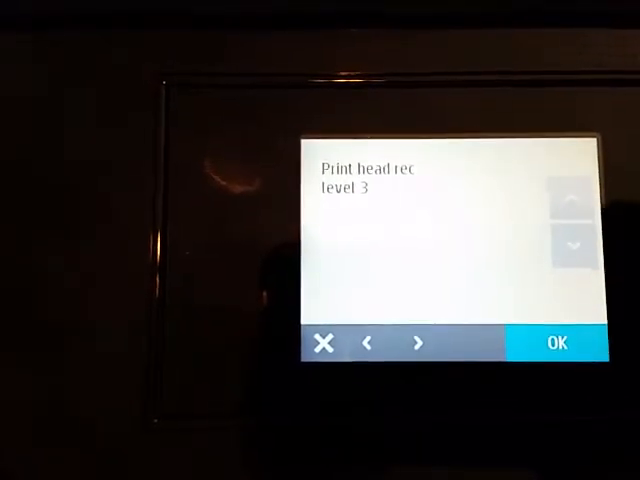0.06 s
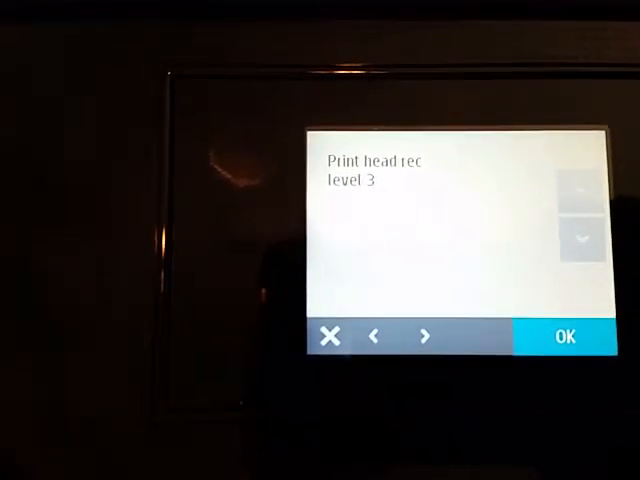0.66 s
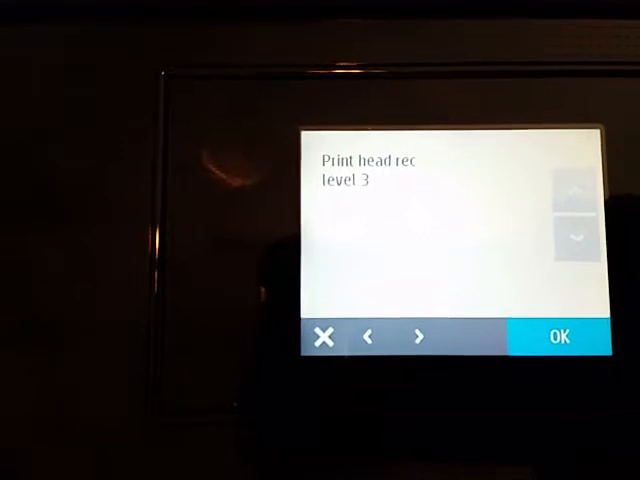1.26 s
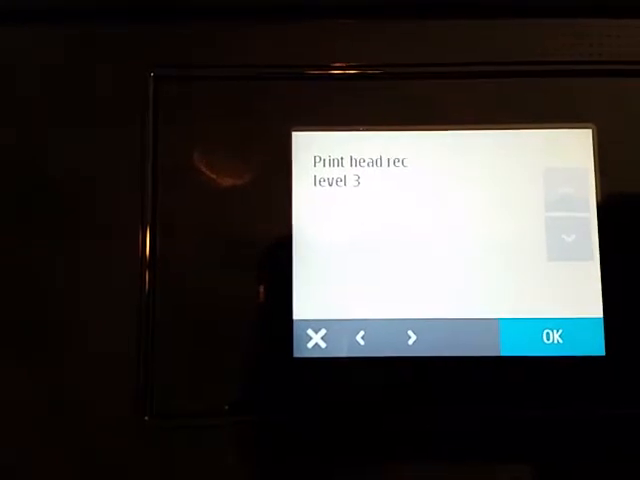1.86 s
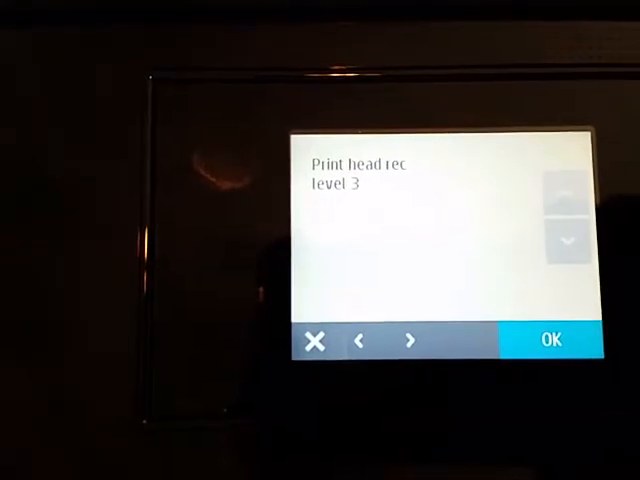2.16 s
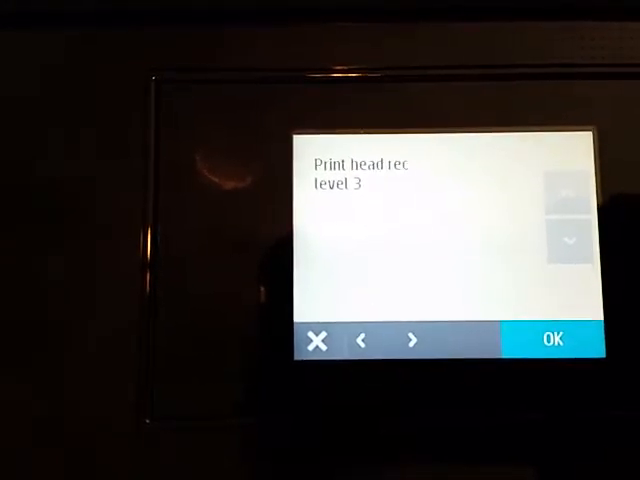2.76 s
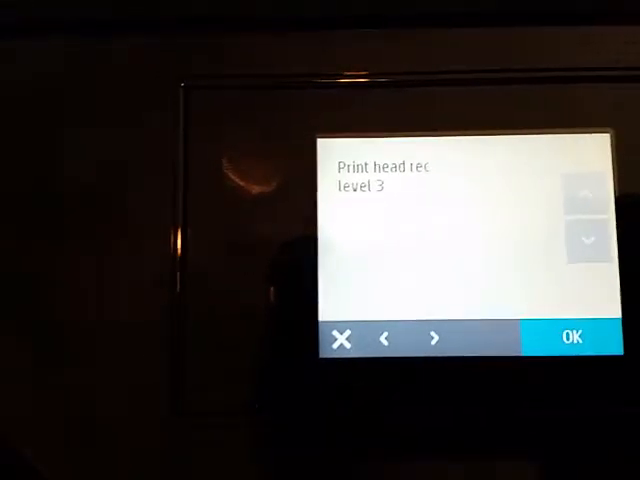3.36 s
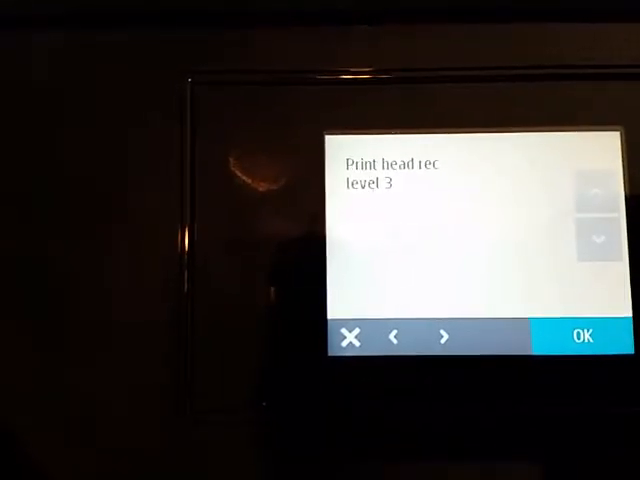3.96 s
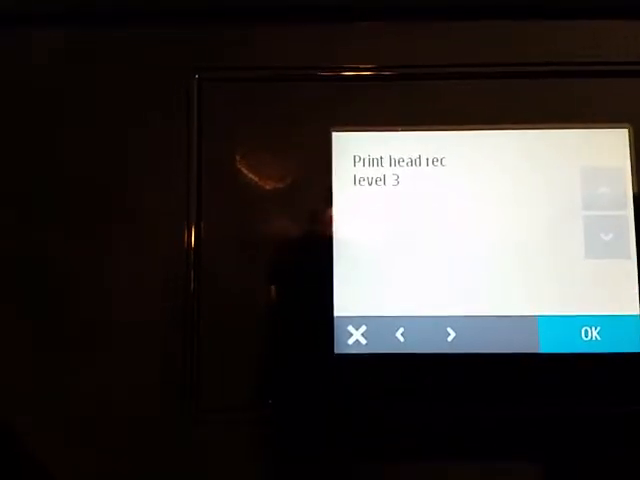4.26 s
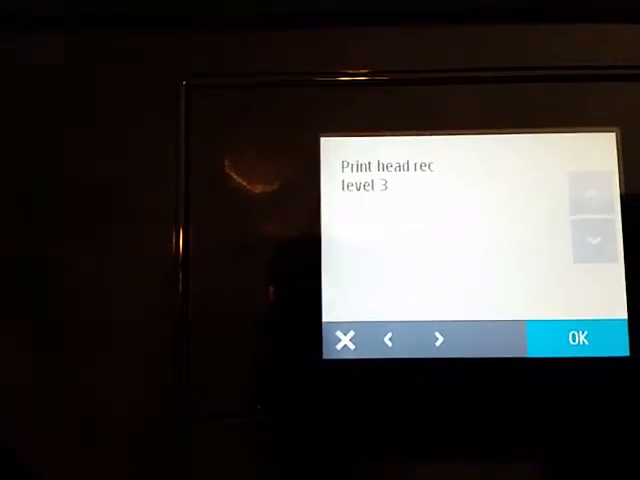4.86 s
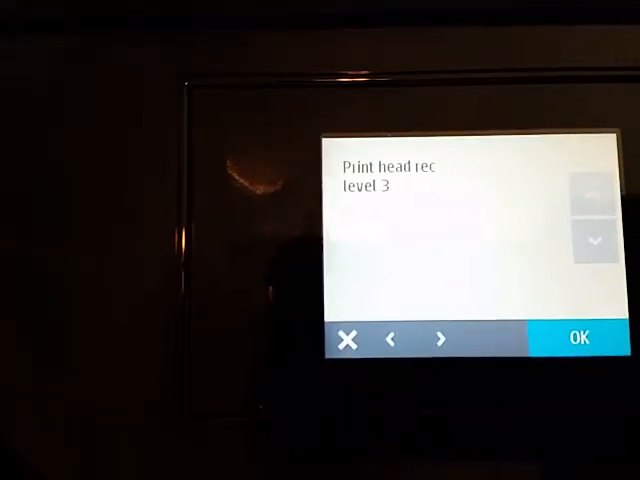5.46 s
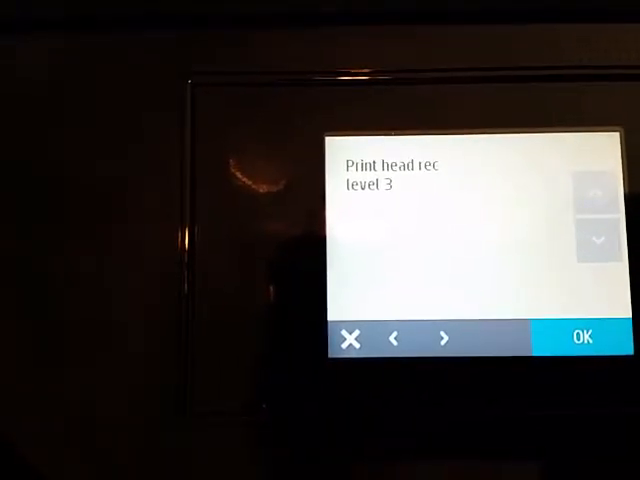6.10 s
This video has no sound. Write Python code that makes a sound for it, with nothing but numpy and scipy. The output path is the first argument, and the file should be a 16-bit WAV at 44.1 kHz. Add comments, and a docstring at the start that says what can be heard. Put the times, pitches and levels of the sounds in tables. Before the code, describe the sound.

An inkjet printer works through a cleaning cycle near a hand-held stereo microphone. A short gear whir with clicks ends in a ringing latch snap. The machine falls quiet, leaving a fading hum, low room noise and dull bumps of a hand on the microphone. Then parts knock into place in the hollow casing, and three bursts of whining, grinding motor follow with busy plastic clatter.

```python
"""An inkjet printer's cleaning cycle in a quiet room, close to the stereo microphone of a hand-held camera.
First a geared motor runs in reverse to park the print head; a sprung latch snaps and a faint hum lingers.
In the pause the hand bumps the camera, over low room rumble and a hiss on the left.
From 3.4 s the cleaning station knocks into place. At 4.5 s the motor starts forward, in three runs:
its gears whine and grind while plastic parts rattle and slide inside the hollow casing."""
import sys
import numpy as np
from scipy import signal
from scipy.fft import rfft, irfft, next_fast_len
from scipy.io import wavfile
from scipy.ndimage import map_coordinates

SR = 44100
rng = np.random.default_rng(int(sys.argv[2]) if len(sys.argv) > 2 else 0)


def bounce(signal):
    """Save signal as a 16-bit WAV file at the path given by the first command-line argument."""
    frames = np.transpose(np.atleast_2d(signal))
    limited = np.clip(frames, -1, 1)
    pcm = np.round(limited * 32767).astype(np.int16)
    wavfile.write(sys.argv[1], SR, pcm)


N = 270333


def amp(db):
    """Decibels to gain."""
    return 10 ** (np.asarray(db) / 20)


def unit(x):
    """x at rms 1."""
    return x / np.sqrt(np.mean(x ** 2) + 1e-20)


def along(points, hz):
    """(freq_hz, value) points read on a log frequency axis."""
    freqs, values = np.transpose(points)
    return np.interp(np.log(hz + 1), np.log(freqs + 1), values)


def wobble(knots_per_s):
    """A smooth random curve."""
    knots = rng.standard_normal(int(N * knots_per_s / SR) + 4)
    return map_coordinates(knots, [np.arange(N) * knots_per_s / SR])


def pan(left_db):
    """Left and right gains of mean power 1, the left louder by left_db."""
    gains = amp(np.array([np.atleast_1d(left_db), -np.atleast_1d(left_db)]) / 2)
    return gains / np.sqrt(np.mean(gains ** 2, axis=0))


def white():
    """Two channels of unrelated noise."""
    return rng.standard_normal((2, N))


def envelope(start, stop, attack_s, t60):
    """Attack, hold and release, between 0 and 1."""
    t = np.arange(N) / SR
    attack = 1 - np.exp(-np.maximum(t - start, 0) / attack_s)
    return attack * amp(-60 * np.maximum(t - stop, 0) / t60)


def blows(times, levels_db, t60, room_db, room_t60):
    """Envelope of contacts: each builds briefly, dies fast in the plastic, then slowly in the room."""
    t = np.arange(SR) / SR
    decay = amp(-60 * t / t60) ** 2 + amp(room_db - 60 * t / room_t60) ** 2
    onset = 1 - np.exp(-t / 0.0025)
    samples = np.clip(np.asarray(times) * SR, 0, N - 1).astype(int)
    power = np.bincount(samples, amp(levels_db) ** 2, N)
    return np.sqrt(np.abs(signal.fftconvolve(power, decay * onset)[:N]))


def chatter(per_s, scatter_db, t60, room_db):
    """A stream of small uneven contacts, rms 1."""
    jitter, strength = rng.standard_normal((int(N / SR * per_s), 2)).T
    times = (np.arange(len(jitter)) + jitter / 2) / per_s
    levels_db = scatter_db * np.clip(strength, -2, 2)
    return unit(blows(times, levels_db, t60, room_db, room_t60=0.27) * white())


# resonances of the hollow casing: pitch_hz, width_hz, lift_db
CASING_MODES = [(117, 110, 5), (226.6, 49, 11.5), (303.3, 26.4, 11.5), (426.4, 61, 8), (514, 78, 7.5),
                (597.4, 18, 7.5), (645, 31, 8.5), (820, 64, 4.5), (940, 48, 6), (1170, 130, 3),
                (1416, 97, -0.5), (1900, 120, 3), (2150, 72, -0.5), (2437, 36, 3.5), (4654, 57, 5.5)]
# how alike the printer sounds on the two sides of the microphone: freq_hz, coherence
COHERENCE = [(60, .86), (130, .93), (290, .9), (640, .72), (1400, .06), (3000, .02)]
# where the printer sits in the stereo image: freq_hz, left_db
BALANCE = [(60, 1.5), (350, 4), (700, 3.5), (1300, -1.5), (2400, -1), (4400, -3), (8100, -1), (13000, 8.5)]
def radiate(pair, spectrum, modes=CASING_MODES, ripple_db=0, coherence=COHERENCE, balance=BALANCE):
    """The path to the microphone: colour a mid and a side excitation and place them in stereo."""
    size = 2 * next_fast_len(N // 2 + SR // 4)
    hz = np.fft.rfftfreq(size, 1 / SR)
    resonances_db = sum(lift / (1 + (2 * (hz - centre) / width) ** 2) for centre, width, lift in modes)
    # higher up, countless small modes of the plastic crowd into narrow random peaks
    crowd = map_coordinates(rng.standard_normal(SR // 40), [hz / 26]) * along([(600, 0), (1500, 1)], hz)
    colour_db = along(spectrum, hz) + resonances_db + ripple_db * crowd
    # minimum phase, so nothing rings before it is struck
    cepstrum = irfft(np.log(unit(amp(colour_db)) + 1e-6))
    cepstrum[1:size // 2] *= 2
    cepstrum[size // 2 + 1:] = 0
    spread = np.arccos(np.clip(along(coherence, hz), -1, 1)) / 2
    mid, side = rfft(pair, size) * np.exp(rfft(cepstrum)) * [np.cos(spread), np.sin(spread)]
    return irfft(np.array([mid + side, mid - side]) * pan(along(balance, hz)), size)[:, :N]


# spectra of the room's rumble and of the hiss: freq_hz, level_db
RUMBLE_SPECTRUM = [(20, -6.5), (85, 0), (170, -9.5), (250, -13.5), (600, -28.5), (1200, -33.5), (2300, -48),
                   (6000, -50.5), (16000, -48.5)]
HISS_SPECTRUM = [(2300, -31), (2900, -14), (3250, -11), (3600, -3.5), (4100, -2), (4650, -9), (5000, -24),
                 (5300, -46), (11500, -43.5), (14300, -21), (16000, -26)]
# slow swell of the hiss: time_s, level_db
HISS_SWELL = [(0, -56.5), (.5, -60.5), (.9, -68), (1.4, -64.5), (1.8, -69.5), (2.5, -73), (3.2, -68),
              (3.7, -64.5), (4.3, -62.5), (6.1, -56.5)]
def room_tone():
    """Low rumble around the microphone, and a hiss on the left that sinks during the pause."""
    rumble = radiate(white(), RUMBLE_SPECTRUM, modes=[], balance=[(60, 1.3), (1000, 1.8)],
                     coherence=[(60, 0.45), (130, 0.47), (290, 0.083), (900, 0)])
    hiss = radiate(white(), HISS_SPECTRUM, modes=[], coherence=[(1000, 0.0087)],
                   balance=[(2800, 10), (4000, 17.2), (6000, 7.4), (15000, 7.7)])
    swell_db = np.interp(np.arange(N) / SR, *np.transpose(HISS_SWELL))
    return amp(-65 + wobble(27)) * rumble + amp(swell_db) * hiss


def swing(t, hz, rise_s):
    """A softly started, heavily damped swing whose envelope peaks at rise_s."""
    return (t / rise_s) ** 2 * np.exp(2 * (1 - t / rise_s)) * np.sin(2 * np.pi * hz * t)


# handling noise, right at the microphone: start_s, thump_db, tap_db, left_db
HAND_BUMPS = [(1.027, -38, -38, -6.5), (1.313, -50, -56, 5), (1.382, -39.5, -59, 13), (1.413, -44, -65, 5),
              (1.466, -41, -48.5, 5), (2.913, -38.5, -72, -16), (3, -38.5, -43, -6.5),
              (3.079, -48.5, -53, 8), (3.135, -50.5, -60, 5)]
def hand_bumps():
    """A hand bumps the camera: a low thump and a dull tap, with no room sound."""
    out = np.zeros((2, N))
    for start, thump_db, tap_db, left_db in HAND_BUMPS:
        t = np.maximum(np.arange(N) / SR - start, 0)
        thump = amp(thump_db) * swing(t, hz=100, rise_s=0.0064)
        tap = amp(tap_db) * swing(t, hz=387, rise_s=0.0032)
        out += pan(left_db) * (thump + tap)
    return out


def whine(shaft_hz, orders, flutter, waver_db):
    """Tones locked to a shaft whose speed flutters under load, left of centre."""
    phase = 2 * np.pi * np.cumsum(shaft_hz * (1 + flutter * wobble(45))) / SR
    tones = sum(amp(level_db + waver_db * wobble(25)) * np.sin(order * phase + rng.uniform(0, 2 * np.pi))
                for order, level_db in orders)
    return np.sqrt(2) * tones * pan(5)


SET_IN_S, COAST_T60_S = 0.0065, 0.51  # onset of hum and idling; fade of hum and motor
# hum from the parked printer: start_s, stop_s, pitch_hz, level_db
PARKED_HUM = (.45, 1.38, 296.5, -68.5)
def hum():
    """A faint, wavering tone lingers after the head has parked."""
    start, stop, pitch_hz, level_db = PARKED_HUM
    tone = whine(pitch_hz, [(1, 0)], flutter=0.01, waver_db=3.5)
    return amp(level_db) * envelope(start, stop, SET_IN_S, COAST_T60_S) * tone


# tiny contacts in the mechanism: start_s, relative_db
TICK_HITS = [(.124, -52), (.225, -47.5), (.427, -51.5), (.953, -69), (1.119, -70), (3.431, -69),
             (3.842, -68), (4.066, -65), (5.002, -41), (5.298, -38), (5.532, -40), (5.611, -46.5),
             (5.871, -51.5), (6.068, -40)]
# their spectrum: freq_hz, level_db
TICK_SPECTRUM = [(3000, -29.5), (7000, -17), (11000, -11.5), (13200, -3.5), (16000, -12.5)]
def ticks():
    """Very short, bright contacts, almost dry this close up."""
    times, levels_db = np.transpose(TICK_HITS)
    bursts = blows(times, levels_db + 8, t60=0.022, room_db=-33, room_t60=0.25) * white()
    return radiate(bursts, TICK_SPECTRUM, modes=[])


# small levers inside the casing: start_s, pitch_hz, level_db
LEVER_FLICKS = [(.199, 2394, -31), (3.964, 1003, -37), (5.139, 1214, -27), (5.28, 1504, -31),
                (5.352, 4960, -34.5), (5.39, 2110, -29.5), (5.427, 1496, -27.5), (5.679, 1155, -31.5),
                (6.114, 2056, -25.5)]
def levers(t60=0.045):
    """Each flicked lever gives one short, wavering plastic ring at its own pitch."""
    out, t = np.zeros((2, N + SR)), np.arange(SR // 5) / SR
    onset = 1 - np.exp(-t / 0.0011)
    for start, pitch_hz, level_db in LEVER_FLICKS:
        drift = np.cumsum(rng.normal(0, 0.029, (2, len(t))), axis=1)
        ring = amp(level_db - 60 * t / t60) * np.sin(2 * np.pi * pitch_hz * t + drift)
        out[:, round(start * SR):][:, :len(t)] += onset * ring
    return out[:, :N]


# the latch snapping shut: start_s, level_db
LATCH_SNAPS = [(.425, -37)]
# modes of its spring: pitch_hz, relative_db, t60_s
SPRING_MODES = [(598, -6, .19), (915, -14, .25), (1017, -11, .26), (1453, -1, .23), (1938, -8, .22),
                (2256, -5.5, .28), (2476, -8, .14), (3420, -19, .1), (4678, -15, .25)]
def latch():
    """The latch spring rings on after the snap, right of centre."""
    out, t = np.zeros((2, N + SR)), np.arange(SR // 2) / SR
    onset = 1 - np.exp(-t / 0.002)
    for start, level_db in LATCH_SNAPS:
        for pitch_hz, mode_db, t60 in SPRING_MODES:
            decay = amp(level_db + mode_db + rng.normal(0, 1) - 60 * t / t60)
            tone = np.sin(2 * np.pi * pitch_hz * t + rng.uniform(0, np.pi / 2, (2, 1)))
            out[:, round(start * SR):][:, :len(t)] += onset * decay * tone
    return out[:, :N] * pan(-5)


def contact(times, levels_db, t60, room_db, room_t60, strike_db):
    """Each contact is one sharp push in the mid channel, then a diffuse ring."""
    push = np.bincount((times * SR).astype(int), amp(levels_db + strike_db), N)
    return blows(times, levels_db, t60, room_db, room_t60) * white() + np.outer([1, 0], push)


# blows of plastic on plastic, levels relative: start_s, body_db, thud_db, clack_db, clack_left_db
KNOCK_HITS = [(0.074, -35.5, -62.5, -40, 2), (.2, -35.5, -63.5, -32, -4), (.256, -32, -46.5, -33, 1.5),
              (0.406, -44, -48, -41.5, 6), (.423, -39, -45, -26.5, -6), (.432, -34, -46, -42, 1),
              (1.276, -50.5, -50, -79, -4), (3.28, -58, -68, -84, 2.5), (3.433, -41, -35, -55.5, 1),
              (3.469, -41, -59, -70, 1), (3.762, -38.5, -41, -54, 0), (3.792, -33.5, -30.5, -58, -6),
              (3.82, -37, -52, -41.5, -5), (3.841, -40, -47, -46, 6), (3.965, -24.5, -29, -34, -6.5),
              (3.999, -30, -33.5, -38.5, 0), (4.022, -36.5, -48, -48, -3), (4.05, -52, -41, -39.5, 1),
              (4.066, -41.5, -43, -37, -0.5), (5.022, -58, -41.5, -35, 2), (5.111, -60, -66, -36, 0),
              (5.137, -46, -40, -30.5, 2), (5.265, -31, -53, -39, 4), (5.283, -24.5, -56, -54, -4),
              (5.388, -26, -40, -45, -4), (5.424, -41.5, -41, -37, -2), (5.454, -34.5, -45, -29, -4),
              (5.473, -53.5, -48.5, -26, 3.5), (5.519, -28.5, -41, -38.5, -6.5),
              (5.54, -37.5, -43, -52, -1), (5.611, -26.5, -56, -24.5, 3), (5.678, -30.5, -34, -28.5, -0.5),
              (5.87, -28.5, -37.5, -32.5, 0), (6.099, -40, -50, -38, -2), (6.113, -49.5, -43, -37.5, -14)]
# spectra of the casing, the chassis and the point of contact: freq_hz, level_db
BODY_SPECTRUM = [(100, -32.5), (190, 2), (300, 0.5), (420, -2.5), (620, -3.5), (900, -4.5), (1250, -4),
                 (1700, -21.5), (2500, -41), (6000, -55.5)]
THUD_SPECTRUM = [(20, -43.5), (40, -11), (65, -5), (100, -2), (150, -8), (250, -24.5), (800, -73.5)]
CLACK_SPECTRUM = [(250, -25), (700, -2), (1200, 1), (2100, 0), (2550, -2), (2900, -11), (4400, -7),
                  (5500, -21.5), (8000, -32.5), (11000, -37.5), (16000, -24)]
def knocks(rebound_s=0.012, rebound_spread=0.2, rebound_db=-10):
    """Each blow rings the casing, shakes the chassis and clacks where it lands, then rebounds once."""
    starts, *levels_db, left_db = np.transpose(KNOCK_HITS)
    place = pan(np.interp(np.arange(N) / SR, starts, left_db))
    flight_s = rebound_s * np.exp(rebound_spread * rng.standard_normal(len(starts)))
    times = np.append(starts, np.minimum(starts + flight_s, (N - 1) / SR))
    body_db, thud_db, clack_db = (np.append(db, db + rebound_db) for db in levels_db)
    body = contact(times, body_db - 4, t60=0.18, room_db=-14, room_t60=0.15, strike_db=20.5)
    thud = contact(times, thud_db, t60=0.038, room_db=-11.5, room_t60=0.62, strike_db=16)
    clack = contact(times, clack_db - 0.8, t60=0.05, room_db=-16.5, room_t60=0.4, strike_db=11)
    return (radiate(body, BODY_SPECTRUM) + radiate(thud, THUD_SPECTRUM, modes=[])
            + place * radiate(clack, CLACK_SPECTRUM, ripple_db=1))


# gear tones in each direction of the drive: shaft_order, relative_db
FORWARD_TONES = [(1, -10.5), (2, -15), (6, -1), (10, -21), (18, -20)]
REVERSE_TONES = [(2, -4), (4, -13.5), (6, -7.5), (8, -15.5)]
# spectrum of the motor brushes: freq_hz, level_db
BRUSH_SPECTRUM = [(9000, -33.5), (12200, -10.5), (12950, 6), (13700, -12.5), (15800, -6)]
# motor runs: start_s, stop_s, spin_up_s, shaft_hz (negative in reverse), whine_db, grind_db, rub_db
MOTOR_RUNS = [(0, 0.251, 0.001, -136.6, -47.5, -46.5, -79), (4.46, 5.135, 0.1174, 114.5, -43.5, -37.5, -56),
              (5.161, 5.436, 0.014, 114, -46.5, -36.5, -55.5), (5.863, 6.12, 0.016, 114, -46, -38, -54.5)]
def motor(speed_sag=0.035, idler_ratio=2.73, idler_db=-7.5, brush_db=-20.5, reverse_brush_db=1):
    """Gears whine and brushes sizzle with the motor's effort; going forward, an idler gear joins in."""
    tones, brushes = np.zeros((2, N)), np.zeros(N)
    for start, stop, spin_up, top_hz, whine_db, _, _ in MOTOR_RUNS:
        effort = envelope(start, stop, spin_up, COAST_T60_S)
        shaft_hz = abs(top_hz) * (1 - speed_sag * (1 - effort))
        if top_hz > 0:
            tone = whine(shaft_hz, FORWARD_TONES, flutter=0.0025, waver_db=0.8)
            tone += whine(idler_ratio * shaft_hz, [(1, idler_db)], flutter=0.02516, waver_db=5.5)
        else:
            tone = whine(shaft_hz, REVERSE_TONES, flutter=0.005, waver_db=1.8)
        tones += amp(whine_db) * effort * tone
        brushes += amp(whine_db) * effort * (1 if top_hz > 0 else amp(reverse_brush_db))
    sizzle = brushes * amp(brush_db) * chatter(per_s=340, scatter_db=3.5, t60=0.0071, room_db=-13.5)
    return tones + radiate(sizzle, BRUSH_SPECTRUM, modes=[])


# gears push a part along, and at 1.27 s a low shudder comes from the hand handling the camera; levels relative:
# # start_s, stop_s, swell_s, grind_db, shudder_db, rattle_db, rub_db
GEAR_STROKES = [(0, 0.005, 0.0016, -41.5, -41, -52, -85), (0.206, 0.293, 0.0202, -38.5, -40.5, -55, -61),
                (0.435, .47, 0.0093, -46.5, -45.5, -65.5, -69.5), (0.563, 0.59, 0.01, -57, -66, -79, -90),
                (0.846, 0.883, .015, -67, -72, -88, -95), (1.268, 1.467, 0.039, -70, -50, -90, -99),
                (3.43, 3.51, 0.056, -49, -47, -88, -77), (3.792, 3.85, 0.042, -39, -38, -62, -72.5),
                (3.967, 4.129, 0.0092, -49.5, -48, -69, -83), (5.243, 5.455, 0.0444, -43, -47, -41.5, -54),
                (5.291, 5.363, 0.019, -29.5, -34, -32.5, -48),
                (5.602, 5.677, .01, -41.5, -47, -48.5, -65.5), (5.975, 6.12, 0.038, -31, -42, -35, -53)]
# the mechanism idles under light load: start_s, stop_s, grind_db, shudder_db
IDLE_SPELLS = [(0, 1.371, -65, -64), (3.253, 3.526, -67, -55.5), (4, 6.12, -63.5, -57)]
def drive(motor_shudder_db=-54, rub_exponent=3.2, tail_db=-3.5):
    """Strength of grinding, shudder, rattle and rubbing: motor runs, strokes and idling add in power."""
    power = np.zeros((4, N))
    grinding, shaking, _, sliding = power  # views of its rows
    for start, stop, spin_up, _, _, grind_db, rub_db in MOTOR_RUNS:
        effort = envelope(start, stop, spin_up, COAST_T60_S)
        grinding += (amp(grind_db) * effort) ** 2
        shaking += (amp(motor_shudder_db) * effort) ** 2
        sliding += (amp(rub_db) * effort ** rub_exponent) ** 2
    for start, stop, swell, *levels_db in GEAR_STROKES:
        push = envelope(start, stop, swell, t60=0.18)
        tail = amp(tail_db) * envelope(start, stop, swell, t60=0.61)  # lingers in casing and room
        power += np.outer(amp(levels_db), np.maximum(push, tail)) ** 2
    for start, stop, *levels_db in IDLE_SPELLS:
        power[:2] += np.outer(amp(levels_db), envelope(start, stop, SET_IN_S, t60=1.2)) ** 2
    return np.sqrt(power)


# spectra of loose and of sliding plastic: freq_hz, level_db
CLATTER_SPECTRUM = [(250, -27.5), (700, -14.5), (1400, -1), (2150, -1.5), (2600, -10.5), (3200, -25.5),
                    (4700, -7), (5300, -18.5), (7000, -18), (9000, -18), (11000, -21), (16000, -33)]
RUB_SPECTRUM = [(2000, -44.5), (5000, -8), (7100, -11.5), (8100, 1.5), (9600, -0.5), (10300, -8),
                (12200, -0.5), (12950, 6), (13700, 4.5), (15800, -1)]
def rattle(rattling, sliding):
    """Loose parts clatter in the casing and sliding parts rub."""
    clatter = rattling * amp(-2.5) * chatter(per_s=130, scatter_db=6.5, t60=0.018, room_db=-10.5)
    friction = sliding * chatter(per_s=230, scatter_db=4.5, t60=0.012, room_db=-10)
    return (radiate(clatter, CLATTER_SPECTRUM, ripple_db=2)
            + radiate(friction, RUB_SPECTRUM, modes=[], ripple_db=2))


# spectra of the gear teeth and of the big panels: freq_hz, level_db
GRIND_SPECTRUM = [(100, -36), (170, -12.5), (230, -15), (330, -9), (600, -4), (900, -6), (1400, -9),
                  (2200, -15), (2900, -20), (4300, -18), (5300, -35.5), (9000, -69)]
DRONE_SPECTRUM = [(120, -18.5), (215, 2), (300, -1), (380, -4.5), (700, -17.5), (2000, -56.5)]
def gears(grinding, shaking):
    """Teeth grind into the casing and the chassis shudders; at light load mostly the panels drone."""
    teeth = grinding * amp(-4.5) * chatter(per_s=114, scatter_db=3.2, t60=0.016, room_db=-8.5)
    drone = grinding ** 0.68 * amp(-18) * white()
    shudder = shaking * amp(-1.5) * white()
    return (radiate(teeth, GRIND_SPECTRUM, ripple_db=1.5) + radiate(drone, DRONE_SPECTRUM)
            + radiate(shudder, THUD_SPECTRUM, modes=[]))


def scene():
    """The printer close by, the hand on the camera and the quiet room behind."""
    grinding, shaking, rattling, sliding = drive()
    running = gears(grinding, shaking) + motor() + hum() + rattle(rattling, sliding)
    impacts = knocks() + latch() + levers() + ticks()
    return running + impacts + hand_bumps() + room_tone()


def record(dry, top_hz=15850):
    """The camera keeps nothing above its band limit."""
    size = next_fast_len(N + SR // 4)
    passband = np.fft.rfftfreq(size, 1 / SR) < top_hz
    return irfft(rfft(dry, size) * passband, size)[:, :N]


dry = scene()
out = record(dry)
bounce(out)
```